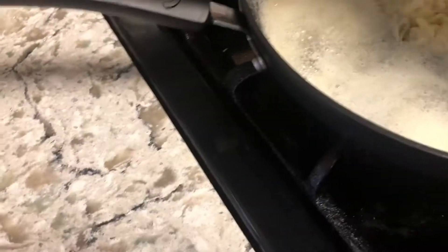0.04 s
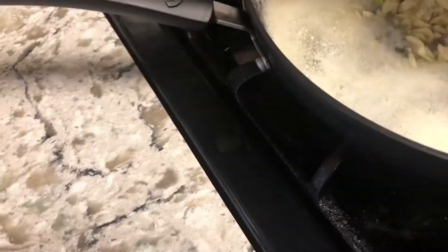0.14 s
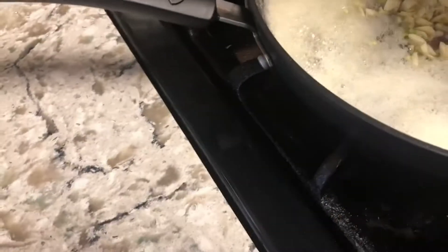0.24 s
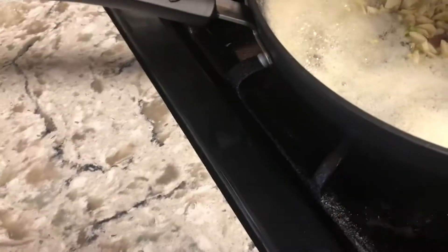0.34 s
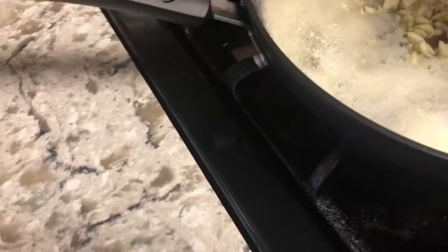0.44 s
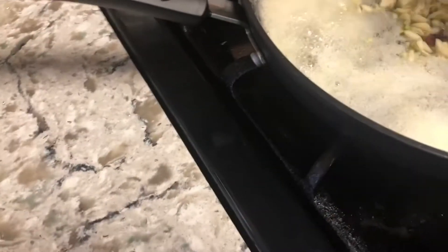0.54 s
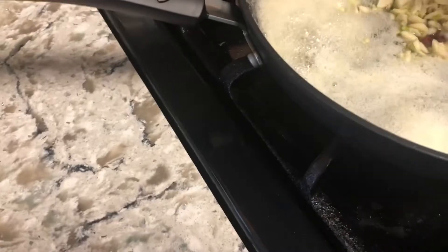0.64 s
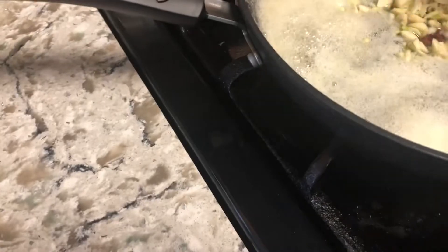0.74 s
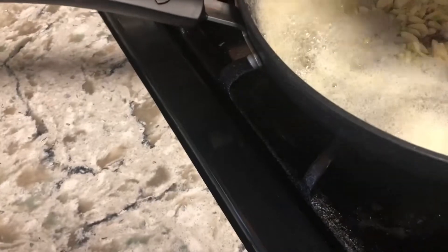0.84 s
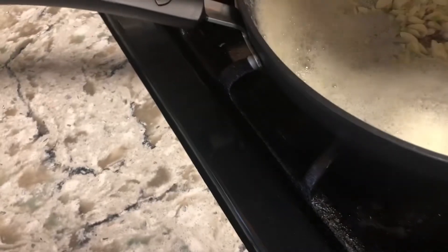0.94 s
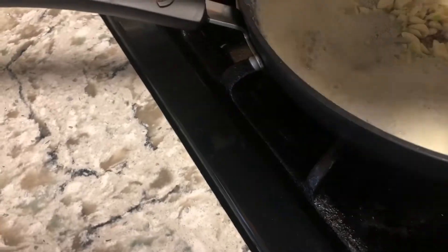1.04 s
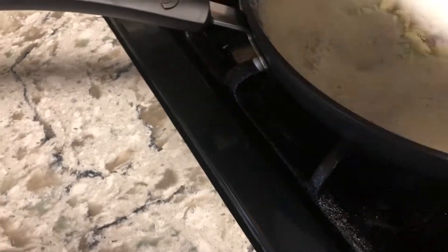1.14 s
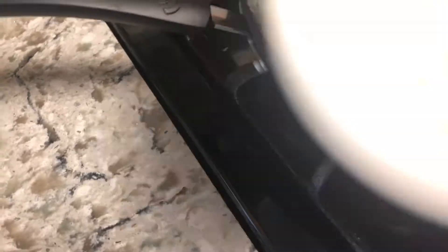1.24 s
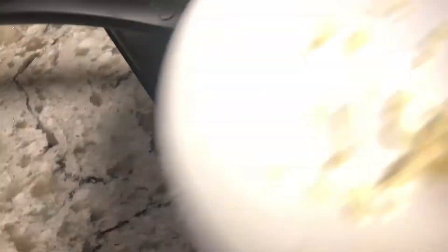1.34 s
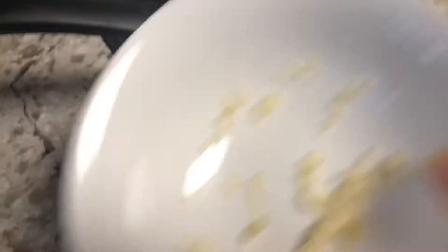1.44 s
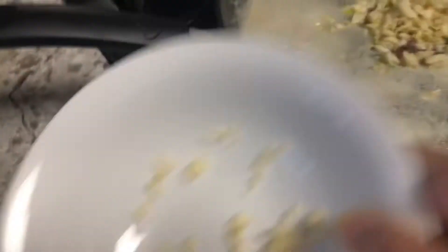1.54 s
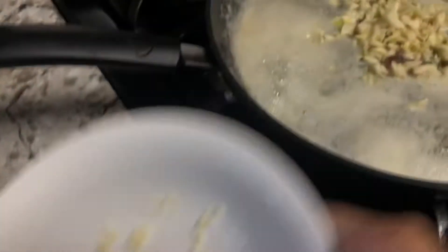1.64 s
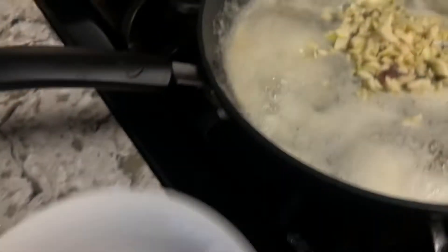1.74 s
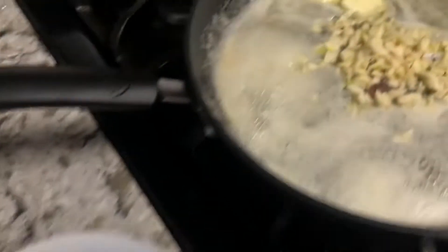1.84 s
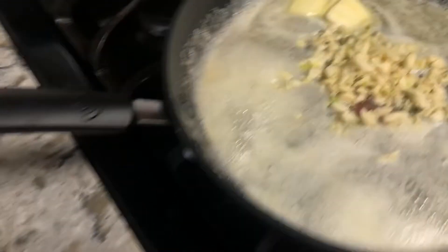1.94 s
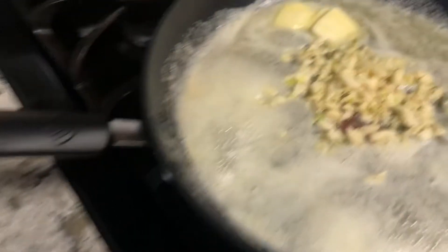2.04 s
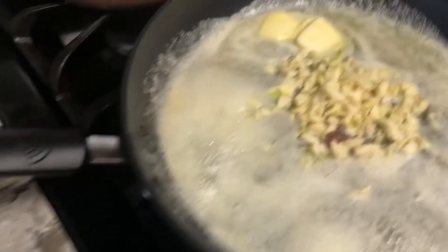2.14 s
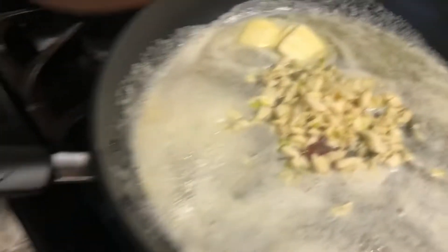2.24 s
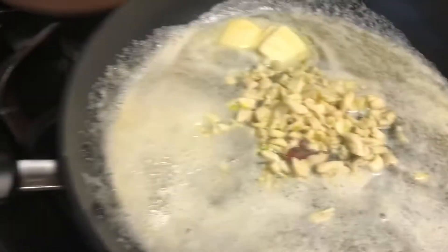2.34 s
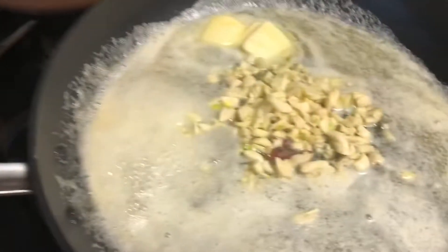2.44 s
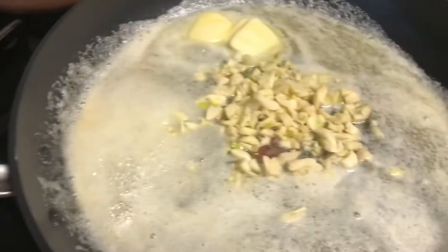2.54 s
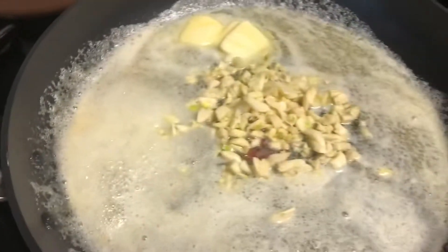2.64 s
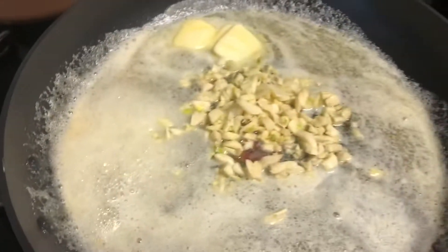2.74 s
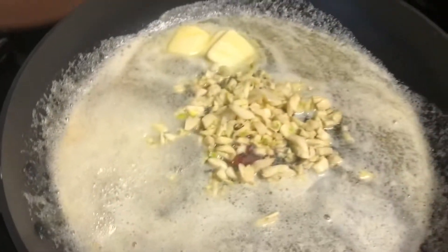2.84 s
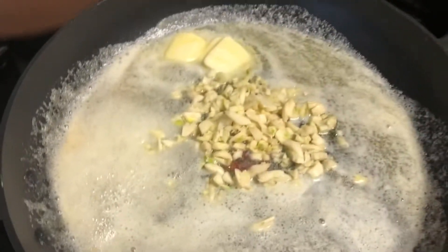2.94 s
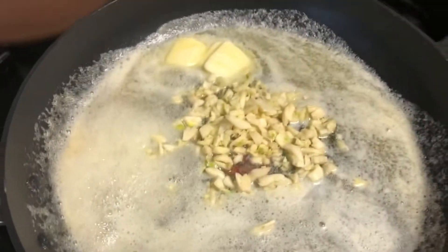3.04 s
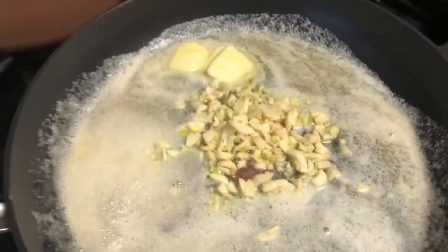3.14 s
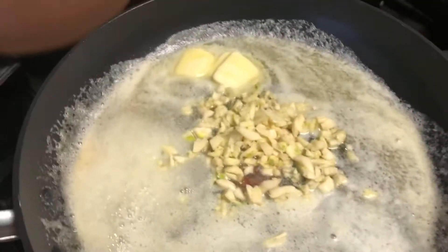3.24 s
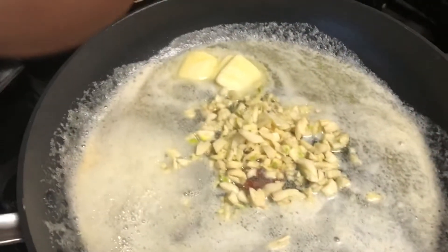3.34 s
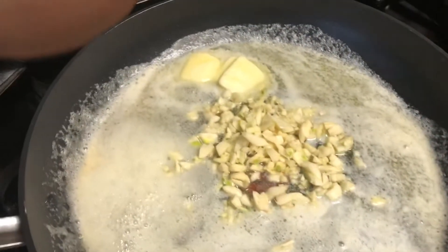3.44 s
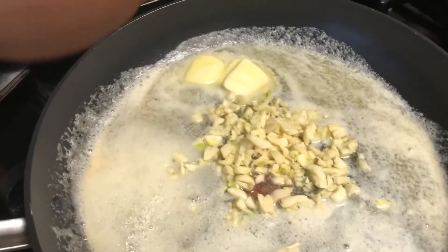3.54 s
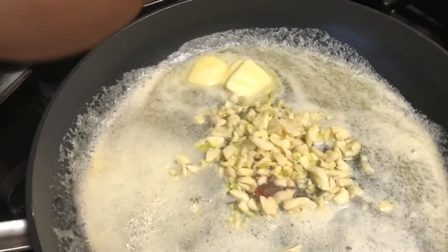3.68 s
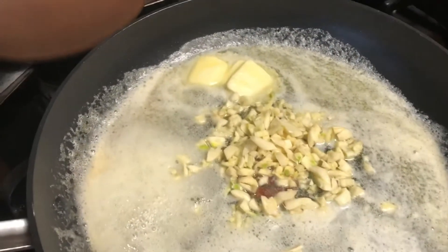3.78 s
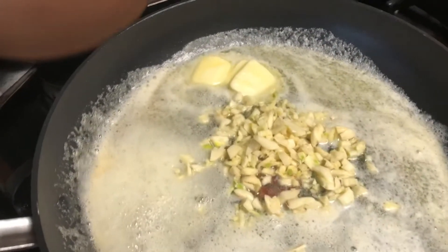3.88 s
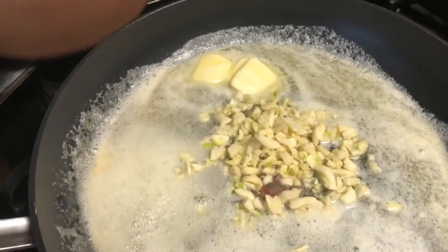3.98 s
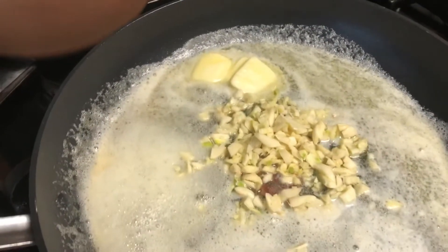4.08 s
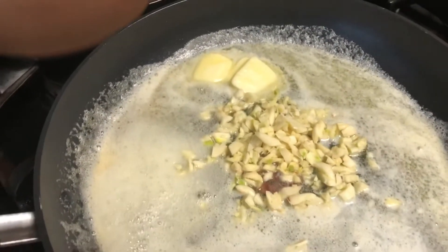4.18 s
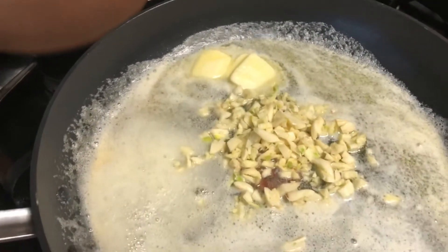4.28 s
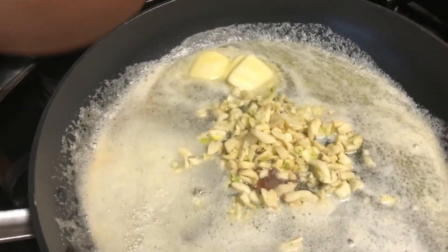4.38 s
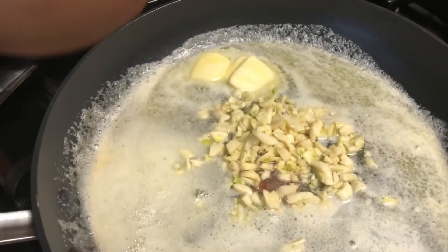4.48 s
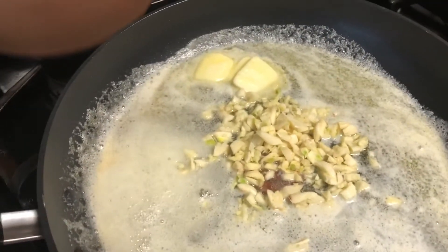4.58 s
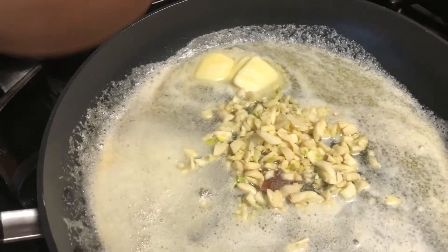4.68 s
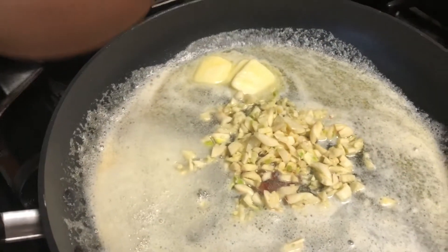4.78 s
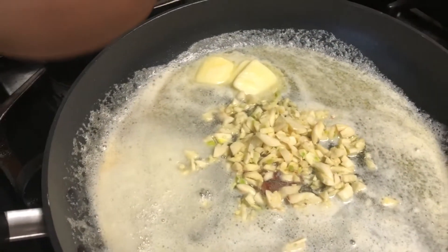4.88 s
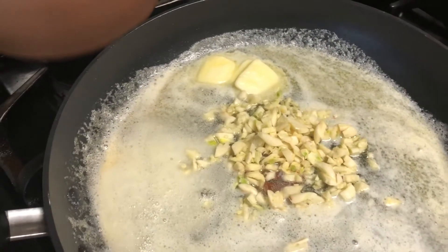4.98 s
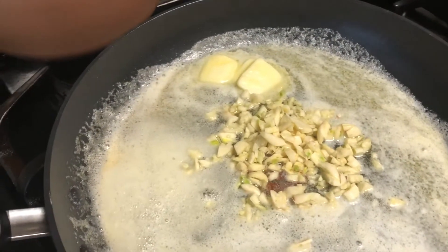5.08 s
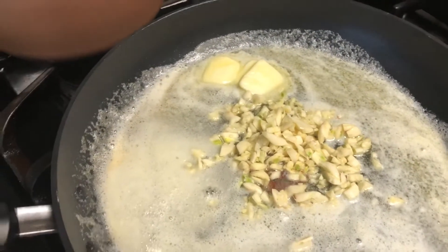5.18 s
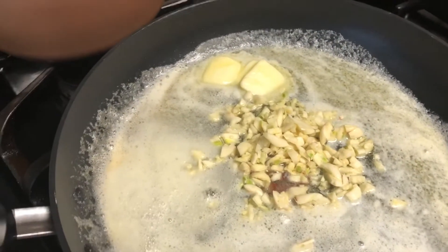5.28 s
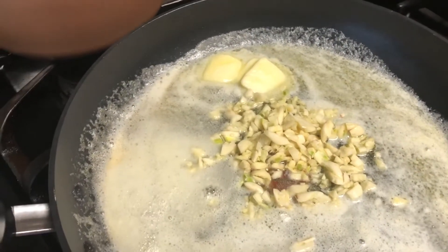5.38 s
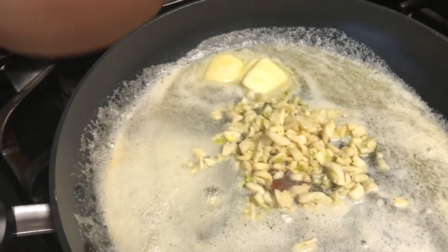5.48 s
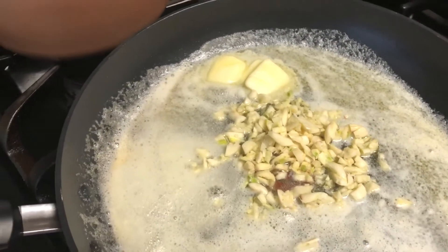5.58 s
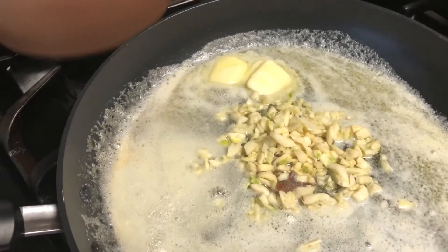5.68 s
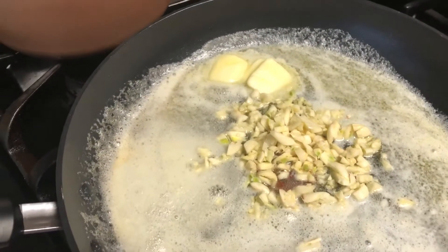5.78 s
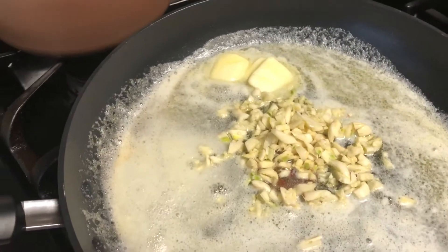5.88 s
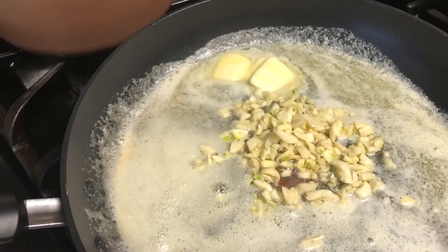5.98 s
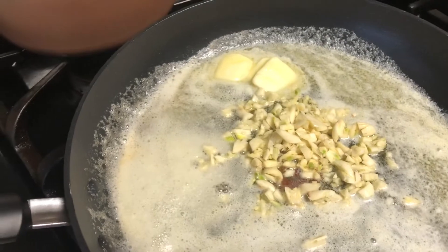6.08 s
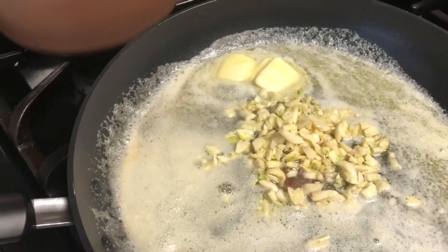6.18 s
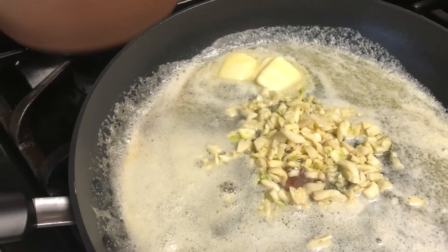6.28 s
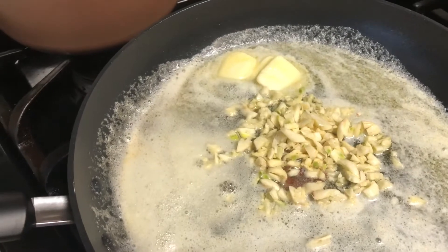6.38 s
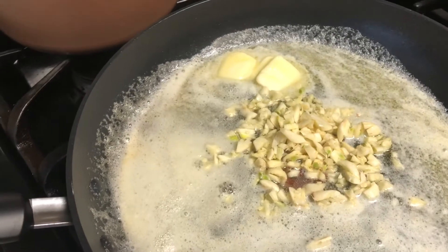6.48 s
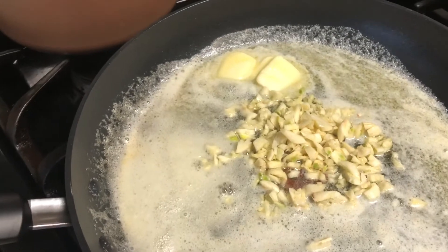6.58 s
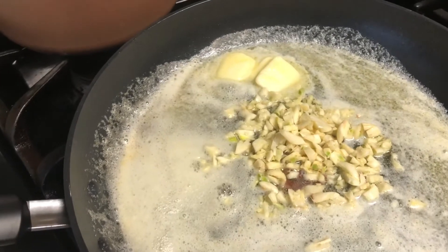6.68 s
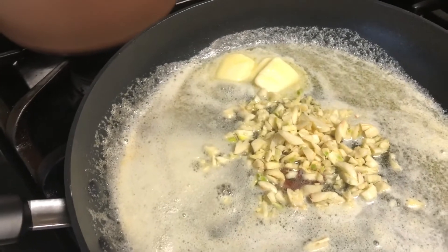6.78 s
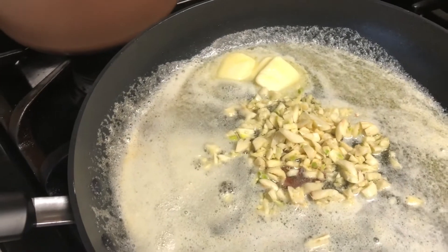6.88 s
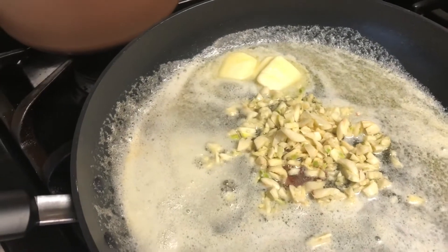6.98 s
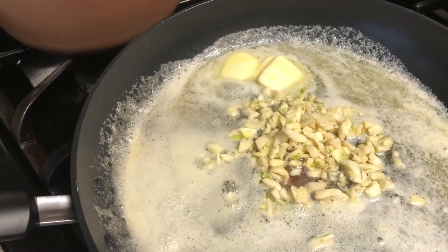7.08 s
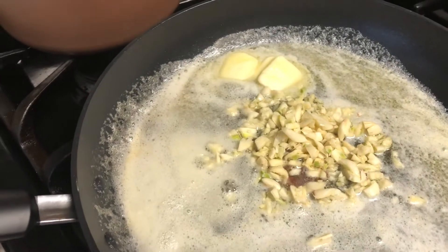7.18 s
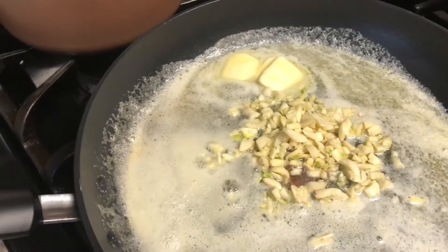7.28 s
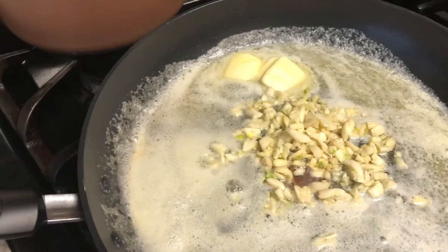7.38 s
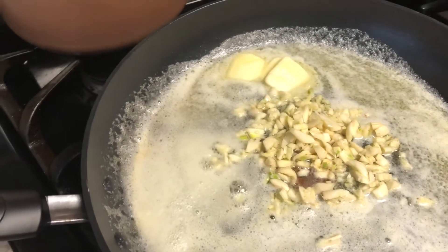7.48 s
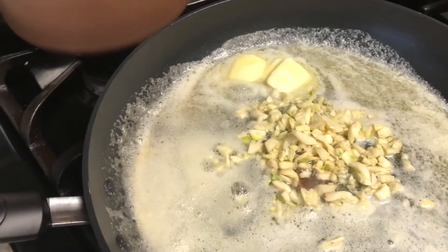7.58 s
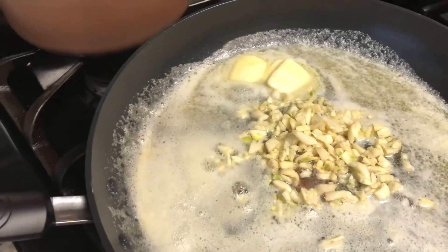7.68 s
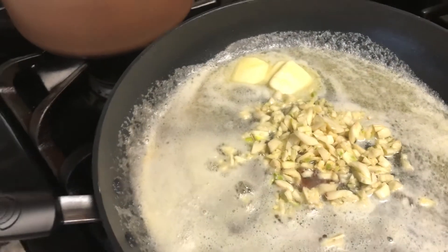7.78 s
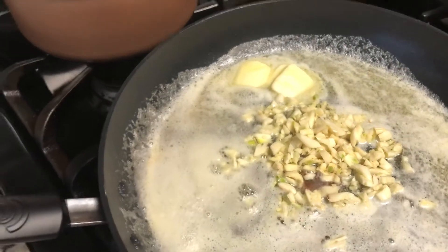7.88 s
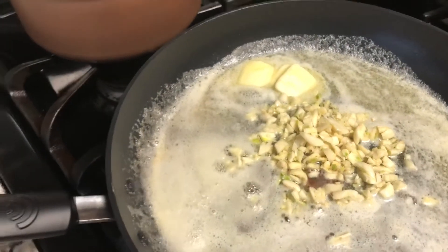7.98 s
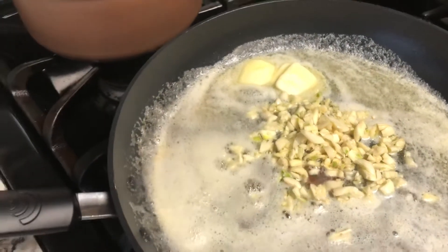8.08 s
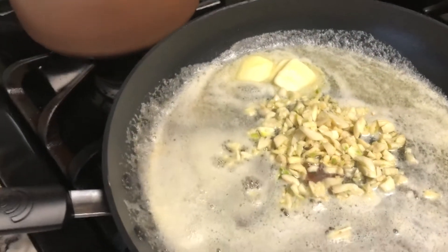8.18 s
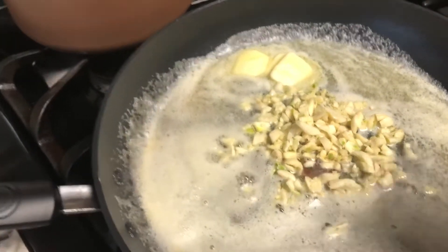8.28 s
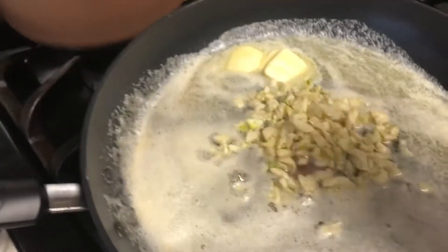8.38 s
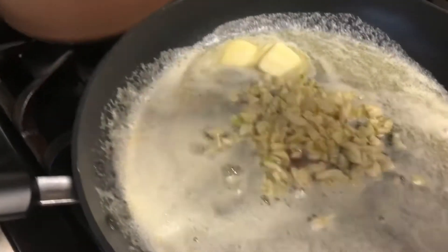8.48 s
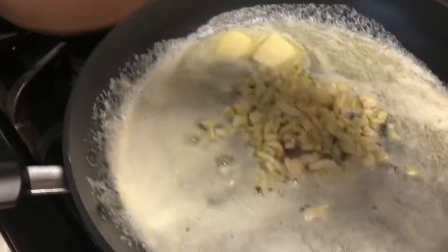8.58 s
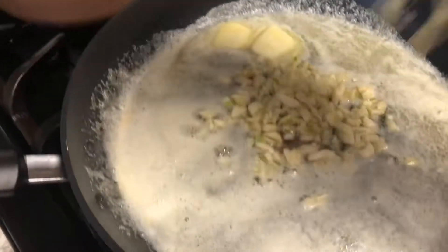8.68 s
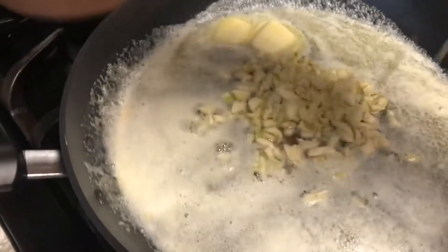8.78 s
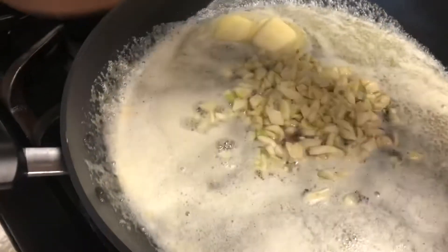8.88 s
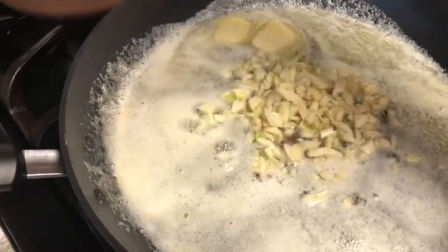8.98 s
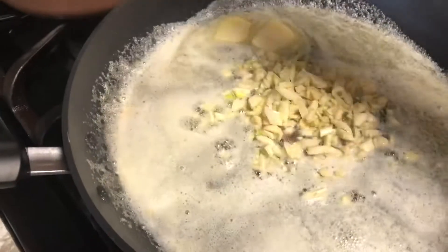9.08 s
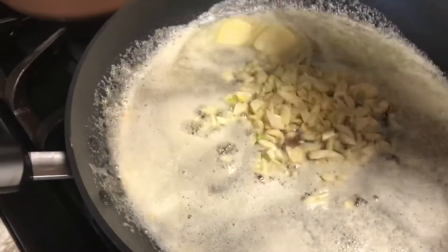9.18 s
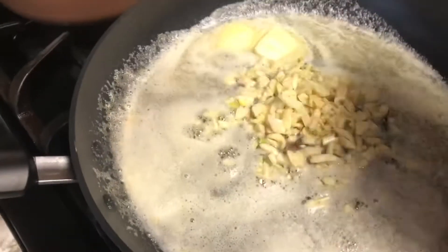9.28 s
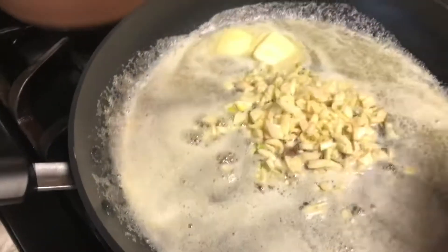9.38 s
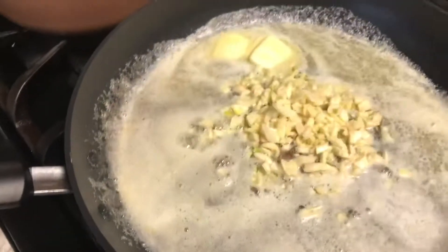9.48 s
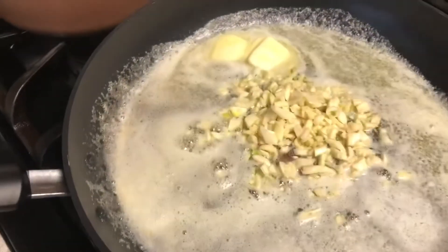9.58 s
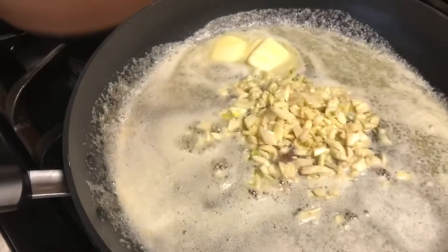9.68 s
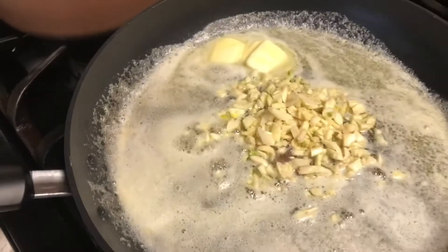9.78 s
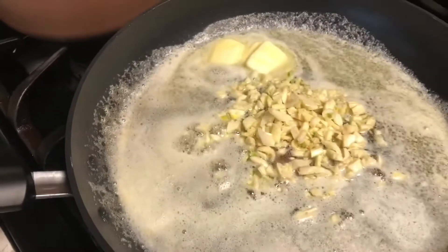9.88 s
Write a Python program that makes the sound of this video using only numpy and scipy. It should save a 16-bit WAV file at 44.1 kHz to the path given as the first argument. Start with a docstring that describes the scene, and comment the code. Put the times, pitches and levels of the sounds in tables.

```python
"""Garlic fries in foaming butter close to the phone: noise for the fine fizz, swelling and dying sines for the bursts.
On the stone counter a china bowl is set down hard; later it is nudged, clinks and rocks: damped modes and blows.
A brushing hand and a fading pan are coloured noise, the pan with two modes; touched steel is high modes.
Behind them the kitchen hums low, noise with three tones, and answers bowl, steel and bursts with decaying noise."""
import sys
import numpy as np
from scipy import signal
from scipy.fft import rfft, irfft, next_fast_len
from scipy.io import wavfile
from scipy.ndimage import uniform_filter1d, map_coordinates

SR = 44100
rng = np.random.default_rng(int(sys.argv[2]) if len(sys.argv) > 2 else 0)


def store_pcm(level_fs):
    """Save levels as 16-bit WAV."""
    pcm = np.round(np.clip(level_fs, -1, 1) * 32767).astype(np.int16)
    wavfile.write(sys.argv[1], SR, np.atleast_2d(pcm).T)


N = 437913

# Butter, close: course of the foam, for hiss and random bursts [t/s, relative level/dB]
FOAM_LEVEL = [(0.0, -51.5), (0.39, -54), (1.12, -55.5), (1.2, -59.5), (1.35, -58), (1.45, -55), (2.16, -52),
              (3.3, -54), (4.8, -55), (6.22, -57), (7.4, -57.5), (9.93, -54.5)]
# colour of the hiss [f/Hz, relative level/dB per Hz]
FIZZ_COLOUR = [(290, -33.5), (500, -8.5), (946, -10.5), (1180, -4.5), (2390, -1), (2770, 2.5), (2980, 0),
               (6330, -2.5), (8830, -3), (10100, -10.5), (14900, -12), (16000, -13.5)]
# the loudest bursting bubbles [t/s before the small delay, peak level/dB before echoes, f/Hz]
BIG_POPS = [(0.0353, -22, 5900), (0.366, -32, 5850), (0.402, -32, 5110), (1.1109, -28, 5730),
            (1.3819, -28.5, 6040), (1.711, -25, 5635), (2.1253, -25, 6580), (2.2593, -26.5, 5260),
            (2.3271, -23.5, 7710), (2.7646, -31.5, 5420), (2.803, -28, 3000), (3.0227, -27.5, 4870),
            (3.1519, -20, 4870), (3.1792, -28, 6460), (3.3207, -29, 4540), (3.367, -29, 4370),
            (3.3877, -31.5, 3470), (3.7045, -19.5, 7590), (3.8062, -28.5, 3670), (4.0386, -25, 4870),
            (4.1844, -25, 5880), (4.3464, -30.5, 5520), (4.583, -24.5, 5430), (4.697, -25.5, 5890),
            (4.7237, -29.5, 3750), (4.9157, -32, 5960), (5.4878, -27, 6000), (5.5328, -29, 7900),
            (5.595, -28.5, 7740), (5.6316, -22, 5660), (5.7564, -25, 4750), (6.343, -30.5, 7030),
            (6.6101, -31, 5370), (6.6287, -26, 5850), (6.8236, -30, 5100), (6.931, -30, 4900),
            (7.0657, -26, 6000), (7.5303, -31.5, 7800), (7.594, -30, 8040), (7.762, -32, 4950),
            (7.9008, -29.5, 5530), (8.0111, -29.5, 8800), (8.1753, -27, 5960), (8.2891, -29.5, 4500),
            (8.533, -24.5, 6440), (8.5611, -17.5, 6350), (8.592, -22.5, 4530), (8.9018, -30.5, 6000),
            (9.8565, -34, 5030)]
# part of the fizz gathers in one band [t/s, level/dB before echoes]
FOCUS_LEVEL = [(0, -55), (1.14, -57.5), (1.22, -64.5), (2.4, -56), (5, -65.5), (9.93, -75.5)]
# that band [centre f/Hz, width/Hz]
FOCUS_BAND = (5870, 2500)
# echoes inside the pan [f/Hz, t60/s]
PAN_WALLS = [(2000, 0.014), (6000, 0.023), (14000, 0.0093)]
BUBBLE_HZ, BUBBLE_SAG_HZ_PER_S = 5540, 83  # the usual burst sinks in pitch as the foam thickens
SMALL_DELAY_S = .0008  # shared by the big pops and the knocks

# Bowl on the counter: its foot lands [t/s before the small delay, relative level/dB, hardness/dB]
FOOT_KNOCKS = [(0.17, -36, -11.5), (1.878, -35, -15), (1.9, 0, -1.5), (2.022, -1.5, -1), (2.05, -2.5, -5),
               (2.065, -10, -13), (2.073, -9, -11.5), (2.079, -16, -4), (2.245, -18, -2.5),
               (2.248, -6, -13), (2.252, -14, -11.5), (2.257, -25, -4), (2.513, -41.5, -20),
               (2.805, -34, -4.5), (5.943, -42, -15.5), (6.381, -46, -23.5), (7.296, -35, -27),
               (7.531, -21.5, -18), (7.573, -9.5, -8), (7.583, -15, -13), (7.587, -15.5, -7.5)]
# modes of the stone slab [f/Hz, relative level/dB, t60/s before choking]
COUNTER_MODES = [(596, -15, 0.047), (736, -2.5, 0.014), (900, 5, 0.042), (986, 5.5, 0.031),
                 (1120, 12, 0.024), (1230, 18.5, 0.016), (1570, -19, .02), (1850, -17.5, .02),
                 (2410, 0.5, 0.029), (2754, -5, 0.018)]
# the hollow under the counter [f/Hz, relative level/dB, t60/s]
CABINET_MODES = [(121, -29.5, 0.068), (237, -23.5, 0.04), (410, -21, 0.036)]
SLAB_TOP_HZ = 3000  # the slab radiates little above this
FREE_HARD_DB, CHOKE_DB_PER_S = -13.5, 149  # harder contacts choke the ringing, so much for each dB more
# the nudged bowl rocks on its foot [t/s before the small delay, relative level/dB, first swing/s, loss a swing/dB]
NUDGES = [(3.428, -30, 0.048, 9.5), (4.489, -25, 0.031, 2), (5.061, -39, 0.02, 22),
          (5.787, -32.5, 0.028, 17.5), (6.717, -36, .021, 3), (7.317, -23.5, .041, 3)]
SWINGS = 7
QUICKEN = .83  # length of each swing over the last
FAR_SIDE, FAR_SIDE_DB, FAR_SIDE_HARD_DB = .33, 2.5, 2.5  # far side: delay as share of a swing, louder, harder
ROCK_HARD_DB, SOFTEN_DB = -21, 0.5  # hardness at the near side, and its loss a swing
# the china is set ringing [t/s, relative level/dB, centre f/Hz of the woken modes, reach/octaves,
# ratio to free t60, place: nearer 1 rim, nearer 0 foot]
CHINA_CLINKS = [(1.902, -35, 7500, 0.52, 0.29, 0), (2.022, -36.5, 7600, .8, 0.51, 0),
                (2.051, -35, 8800, 0.24, 0.44, 0), (2.073, -42, 7000, .6, 0.56, 0),
                (2.246, -39, 8100, 0.3, 0.34, 0), (3.303, -31.5, 4300, 0.53, 0.51, 1),
                (3.365, -52, 2600, 0.77, 0.38, 1), (3.495, -61, 8600, .2, .6, 0),
                (4.387, -50, 9840, .4, 0.49, 0), (4.451, -46, 4000, 0.81, 1.3, 0.74),
                (5.035, -52, 8000, .6, 0.24, 0), (5.942, -42.5, 9500, 0.46, 0.29, 0),
                (6.518, -65, 2500, 0.71, 1.8, 1), (7.265, -47, 2420, 1.3, 2.3, 1),
                (7.318, -54, 8000, 0.78, 0.46, 0), (7.587, -45, 11700, 0.82, 0.5, 0)]
# modes of the bowl [f/Hz, relative level/dB, free t60/s, place: 1 rim, 0 foot]
BOWL_MODES = [(1010, 8, .035, 1), (2462, 0, .3, 1), (4318, -5, .13, 1), (6390, 0, .24, 0),
              (6590, -4, .1, 1), (7590, -9, .11, 0), (8620, -2, .15, 0), (9060, -4, .14, 1),
              (10390, -5, .13, 0), (11930, -8, .16, 1), (12180, -2, .11, 0)]
OTHER_PLACE_DB = -14  # gain of modes that belong to the other place

# A small steel thing: its modes [f/Hz, relative level/dB, free t60/s]
STEEL_MODES = [(9130, -2, 0.1), (11120, -4, 0.19), (12290, 0, .15)]
# it is touched [t/s, relative level/dB, ratio to free t60]
STEEL_TOUCHES = [(3.705, -39, 0.52), (6.40, -71, 4), (6.53, -68.5, 4)]

# Pan: a hand brushes over it [t/s, level/dB before flicker]
BRUSH_LEVEL = [(8.67, -61), (8.7, -57.5), (8.775, -47.5), (8.8, -56.5), (8.86, -69.5)]
# colour of the brushing [f/Hz, relative level/dB per Hz]
BRUSH_COLOUR = [(150, -33), (250, -25), (404, -4.5), (631, -2.5), (1300, -8.5), (2200, -15.5), (15000, -27)]
# noise of a blow on the pan, just dying away [t/s, level/dB]
CLATTER_LEVEL = [(0.0, -36), (0.084, -54), (0.2, -63)]
# colour of that noise [f/Hz, relative level/dB per Hz]
CLATTER_COLOUR = [(120, -52), (200, -16.5), (405, -32), (467, -2.5), (521, -15), (3350, -30), (5550, -20),
                  (15000, -37)]
# the pan still rings from the blow [f/Hz, level/dB before flicker, t60/s]
PAN_MODES = [(457, -49.5, 0.9), (563, -48.5, 0.58)]

# Kitchen, background: course of the hum noise [t/s, level/dB before wavering]
HUM_LEVEL = [(0, -57.5), (1, -58.5), (9.93, -60)]
# colour of the hum noise [f/Hz, relative level/dB per Hz]
HUM_COLOUR = [(15, -26.5), (25, -11), (64, 2), (123, -6), (146, -7.5), (321, -8), (408, -12.5),
              (468, -11.5), (510, -15.5), (867, -18.5), (1180, -18), (1500, -21.5), (1950, -41.5),
              (3300, -120)]
# appliance tones [f/Hz, rms level/dB before wavering]
APPLIANCE_TONES = [(119.5, -64.5), (285, -71), (1200, -78.5)]
# the room's answer [f/Hz, t60/s]
ROOM_DECAY = [(200, 0.76), (1400, 0.37), (2500, 0.35), (4000, .35), (12000, 0.13)]
TOP_HZ = 16000  # band limit of the phone


def butter():
    """Foaming fat: many tiny bursts merge into hiss, larger ones stand out and echo between the pan walls."""
    level = amp(curve(FOAM_LEVEL) + 0.43 * wobble(9))
    hiss = level * amp(-3.0) * rush(FIZZ_COLOUR, patchy_db=2.0)
    pops = bursts(level)
    return hiss, pops + amp(-9) * echoes(pops, PAN_WALLS, delay=0.00066, count=40)


def bursts(level):
    """Steam bubbles bursting: three random crowds, a gathered band, and big pops with a broad snap on each."""
    small = crackle(count=5000, ratio=1.02, spread=0.39, cycles=0.22, db=-4.5, tail_db=1.5)
    middle = crackle(count=1000, ratio=1.0, spread=0.36, cycles=0.56, db=10.5, tail_db=3.5)
    thin = crackle(count=900, ratio=1.9, spread=0.23, cycles=0.65, db=-5, tail_db=6.5)

    s, db, hz = np.transpose(BIG_POPS)
    cycles = 0.6 * np.exp(0.6 * rng.standard_normal(len(s)))
    big = bubbles(s + SMALL_DELAY_S, db, hz, cycles)
    snap = bubbles(s + SMALL_DELAY_S, db - 14, hz * 1.6, np.full(len(s), .6))

    centre, width = FOCUS_BAND
    band = filtered(small + 0.22 * middle, lambda f: 1j * f * width / (centre ** 2 - f * f + 1j * f * width))
    focus = amp(curve(FOCUS_LEVEL)) * unit(band)
    return level * (small + middle + thin) + focus + big + snap


def crackle(count, ratio, spread, cycles, db, tail_db):
    """Random bursts in clumps, log-normal in pitch around ratio times the usual, a few much larger than the rest."""
    chance = rng.random((count, 2))
    scatter = rng.standard_normal((count, 2))
    # a wavering density gathers the bursts in clumps
    density = np.cumsum(amp(3.2 * wobble(25)))
    s = np.interp(chance[:, 0] * density[-1], density, np.arange(N) / SR)
    size_db = db - tail_db * np.log(0.032 + 1.8 * chance[:, 1])
    usual_hz = BUBBLE_HZ - BUBBLE_SAG_HZ_PER_S * s
    pitch_hz = np.clip(ratio * usual_hz * np.exp(spread * scatter[:, 0]), 1800, 15000)
    return bubbles(s, size_db, pitch_hz, cycles * np.exp(0.04 * scatter[:, 1]))


def bubbles(s, db, hz, cycles):
    """Each burst is a sine that swells for a number of cycles and then dies."""
    k = np.arange(96)  # samples of one burst
    turns = hz[:, None] * k / SR
    shape = np.sin(2 * np.pi * turns) * turns * np.exp(-turns / cycles[:, None])
    shape *= amp(db)[:, None] / np.abs(shape).max(1, keepdims=True)
    places = np.round(s * SR).astype(int)[:, None] + k
    return np.bincount(places.ravel(), shape.ravel(), N + 128)[:N]


def knocks():
    """Foot on stone: a harder contact wakes higher slab modes, with a falling blow, the cabinet and a thin crack."""
    slab, cracks = np.zeros(N), np.zeros(N)
    t = np.arange(SR // 10) / SR
    octaves = np.log2(np.transpose(COUNTER_MODES)[0] / 1150)
    # bending waves in the slab: the high part arrives first, so the blow falls in pitch
    glide_hz = 1150 + 2200 * np.exp(-t / 0.000747)
    swell = (t / 0.0021) * np.exp(1 - t / 0.0013)
    blow = swell * np.sin(2 * np.pi * np.cumsum(glide_hz) / SR)
    for s, db, hard_db in [*FOOT_KNOCKS, *rocking()]:
        tilt_db = 0.57 * hard_db * octaves + rng.normal(0, 0.85, len(octaves))
        choke = amp(-CHOKE_DB_PER_S * max(hard_db - FREE_HARD_DB, 0) * t)
        body = ringing(COUNTER_MODES, tilt_db, t) * choke * (1 - np.exp(-t / 0.002))
        body += amp(19.5 + 1.2 * hard_db) * blow
        hollow = ringing(CABINET_MODES, 0.25 * hard_db, t) * (1 - np.exp(-t / 0.0017))
        add(slab, s + SMALL_DELAY_S, amp(db) * (body / np.abs(body).max() + hollow))
        # the crack loses 60 dB in 2.5 ms
        crack_db = db + 2.2 * min(hard_db, 0) - 4 - 60 * t / .0025
        add(cracks, s + SMALL_DELAY_S, amp(crack_db) * rng.standard_normal(len(t)))
    b, a = signal.butter(5, SLAB_TOP_HZ, fs=SR)
    return signal.lfilter(b, a, slab), filtered(cracks, lambda hz: 1 / (1 + 1j * hz / 5000))


def rocking():
    """Ever quicker, weaker and softer swings of the bowl, each a double contact: rows like FOOT_KNOCKS."""
    k = np.arange(SWINGS)
    rows = []
    for s, db, swing, loss_db in NUDGES:
        near = s + swing * (1 - QUICKEN ** k) / (1 - QUICKEN)
        far = near + FAR_SIDE * swing * QUICKEN ** k
        level_db = db - loss_db * k
        hard_db = ROCK_HARD_DB - SOFTEN_DB * k
        rows += zip(near, level_db, hard_db)
        rows += zip(far, level_db + FAR_SIDE_DB, hard_db + FAR_SIDE_HARD_DB)
    return rows


def clinks():
    """Ringing china: the place of the touch chooses the modes; the hand or the counter can shorten them."""
    out, t = np.zeros(N), np.arange(SR // 3) / SR
    hz, level_db, t60, place = np.transpose(BOWL_MODES)
    for s, db, centre_hz, reach, free, rim in CHINA_CLINKS:
        gain_db = db - 6 * (np.log2(hz / centre_hz) / reach) ** 2
        gain_db += OTHER_PLACE_DB * (place != round(rim))
        gain_db += rng.normal(0, 1.2, len(hz))
        modes = np.transpose([hz, level_db, t60 * free])
        add(out, s, ringing(modes, gain_db, t) * (1 - t / t[-1]))
    return out


def tinkles():
    """Thin high partials of touched steel, a little unsteady."""
    out, t = np.zeros(N), np.arange(SR // 3) / SR
    envelope = (1 - np.exp(-t / 0.0016)) * (1 - t / t[-1])
    for s, db, free in STEEL_TOUCHES:
        modes = np.multiply(STEEL_MODES, [1, 1, free])
        add(out, s, ringing(modes, db, t) * envelope)
    return out * amp(5.0 * wobble(60))


def rubbing():
    """The fading pan, as noise and unsteady modes, and the gritty noise of the brushing hand."""
    pan = amp(curve(CLATTER_LEVEL)) * rush(CLATTER_COLOUR, patchy_db=1.5)
    t = np.arange(SR // 2) / SR
    add(pan, 0, ringing(PAN_MODES, 0, t) * amp(2.5 * wobble(40))[:len(t)])
    brush = amp(curve(BRUSH_LEVEL) + 4.5 * wobble(150)) * rush(BRUSH_COLOUR, patchy_db=2.5)
    return pan + brush


def hum():
    """Burner and appliances: low noise with tones slightly unsteady in level and phase."""
    t = np.arange(N) / SR
    out = amp(curve(HUM_LEVEL) + 1.6 * wobble(4.4)) * rush(HUM_COLOUR, patchy_db=1.03)
    for hz, db in APPLIANCE_TONES:
        level = np.sqrt(2) * amp(db + 2 * wobble(3))  # rms to peak
        out += level * np.sin(2 * np.pi * hz * t + wobble(12))
    return out


def echoes(x, decays, delay, count):
    """Each frequency of the answer dies at its own speed; each of count stretches of time has its own tail."""
    out, step = np.zeros(N), N // count + 1
    length = int(SR * max(t60 for _, t60 in decays)) + 256
    for start in range(0, N, step):
        noise = rng.standard_normal(SR // 2 + SR // 4)[:length]
        hz, t, z = signal.stft(noise, SR, nperseg=64)
        fade = amp(-60 * t / along(decays, hz)[:, None])
        tail = signal.istft(z * fade, SR, nperseg=64)[1]
        tail *= 1 - np.exp(-np.arange(len(tail)) / SR / delay)  # builds up over the delay/s
        answer = signal.fftconvolve(x[start:start + step], tail / np.linalg.norm(tail))
        add(out, start / SR, answer)
    return out


def ringing(modes, gain_db, t):
    """Damped sines of a table of modes, each with a gain of its own."""
    hz, db, t60 = np.transpose(modes)[:, :, None]
    level = amp(db + np.reshape(gain_db, (-1, 1)) - 60 * t / t60)
    return (level * np.sin(2 * np.pi * hz * t)).sum(0)


def rush(spectrum, patchy_db):
    """Coloured noise of rms 1, with patches of random gain in time and frequency."""
    z = signal.stft(rng.standard_normal(N), nperseg=256)[2]
    field = uniform_filter1d(rng.standard_normal(z.shape), 10, 0)
    field = uniform_filter1d(field, 5, 1)
    noise = signal.istft(z * amp(patchy_db * unit(field)), nperseg=256)[1][:N]
    return unit(filtered(noise, lambda hz: amp(along(spectrum, hz))))


def filtered(x, response):
    """x times a response of frequency."""
    m = next_fast_len(N + SR // 2)
    return irfft(rfft(x, m) * response(np.fft.rfftfreq(m, 1 / SR)), m)[..., :N]


def wobble(rate):
    """A smooth random curve, rate knots a second."""
    knots = rng.standard_normal(int(N * rate / SR) + 4)
    coarse = np.arange(0, N + 16, 16)  # every 16th sample
    return np.interp(np.arange(N), coarse, map_coordinates(knots, [coarse * rate / SR]))


def curve(rows):
    """A level/dB per sample from (t/s, level/dB) rows, silent outside them."""
    s, db = np.transpose(rows)
    return np.interp(np.arange(N) / SR, s, db, left=-200, right=-200)


def along(points, hz):
    """(f/Hz, value) points read on a log axis."""
    f, v = np.transpose(points)
    return np.interp(np.log(hz + 1), np.log(f + 1), v)


def amp(db):
    """Level/dB to amplitude."""
    return 10 ** (np.asarray(db) / 20)


def unit(x):
    """Scales to rms 1."""
    return x / np.sqrt(np.mean(x ** 2) + 1e-20)


def add(track, s, sound):
    """Mixes a sound in at a time/s."""
    part = track[max(round(s * SR), 0):][:len(sound)]
    part += sound[:len(part)]


def scene():
    """Near butter, bowl, steel and rubbing, the room's answer and the hum."""
    hiss, pops = butter()
    bowl, cracks = knocks()
    rim = clinks() + tinkles()
    near = hiss + pops + bowl + cracks + rim + rubbing()
    to_room = amp(-10.0) * bowl + amp(-12.0) * (rim + cracks) + amp(-15.0) * pops
    room = echoes(to_room, ROOM_DECAY, delay=0.0039, count=24)
    return (near + hum() + room)[None]


def record(dry):
    """The microphone drops the deepest bass; the phone keeps nothing above its band limit."""
    return filtered(dry, lambda hz: (hz < TOP_HZ) * hz ** 2 / (hz ** 2 + 38 ** 2))


dry = scene()
out = record(dry)
store_pcm(out)
```